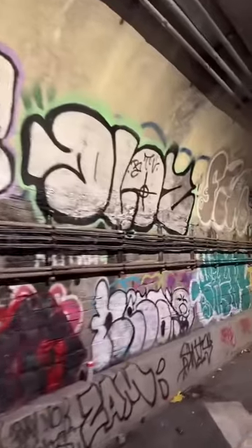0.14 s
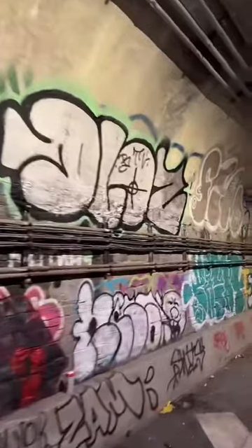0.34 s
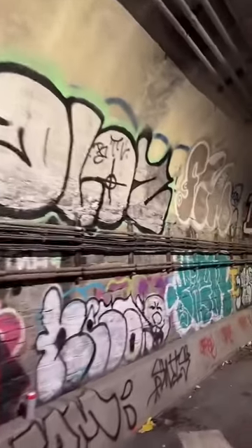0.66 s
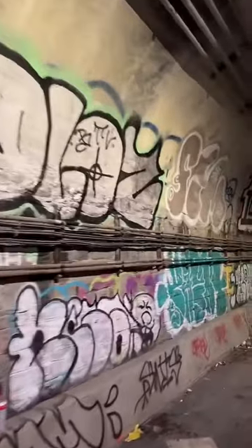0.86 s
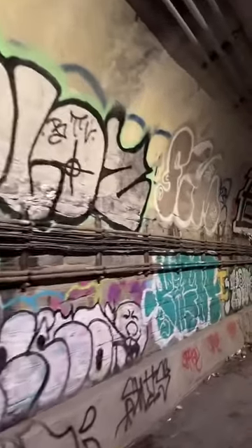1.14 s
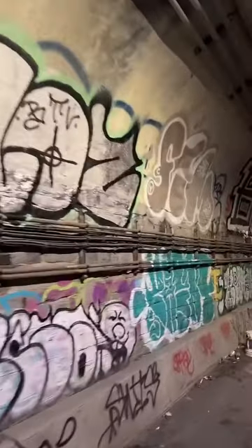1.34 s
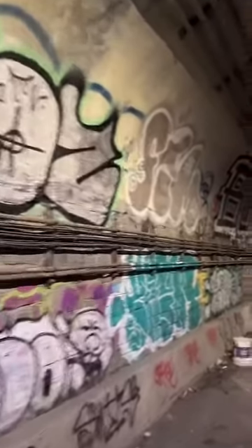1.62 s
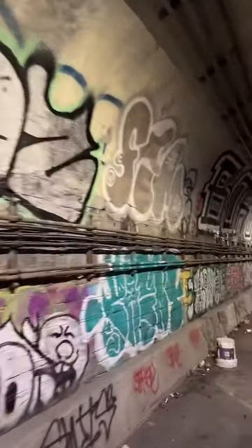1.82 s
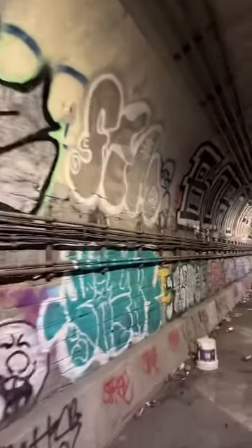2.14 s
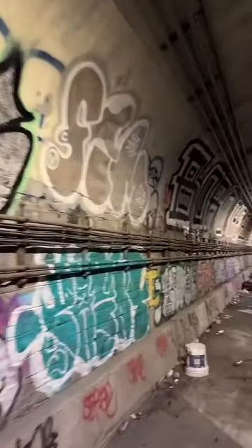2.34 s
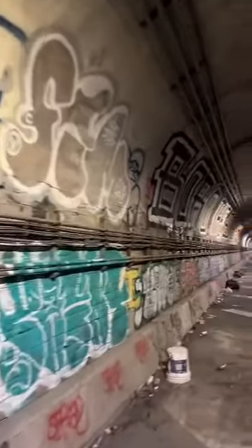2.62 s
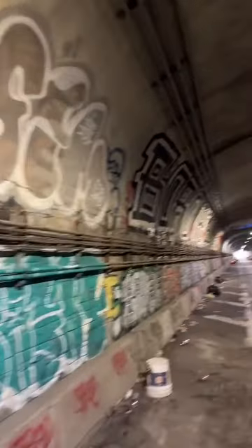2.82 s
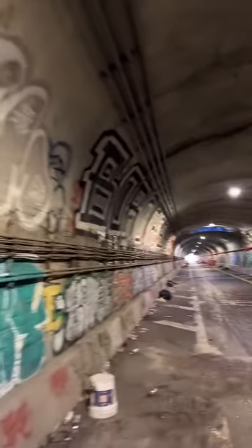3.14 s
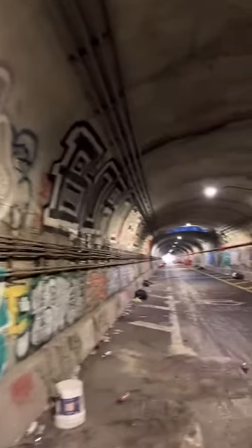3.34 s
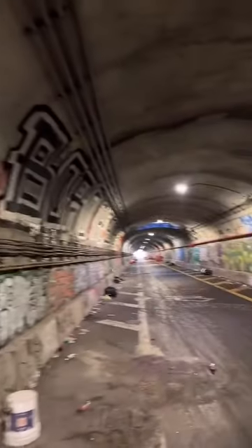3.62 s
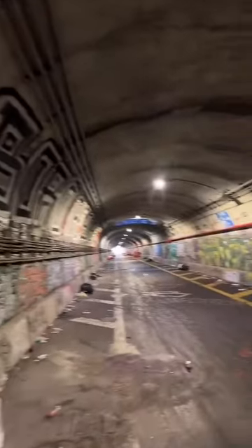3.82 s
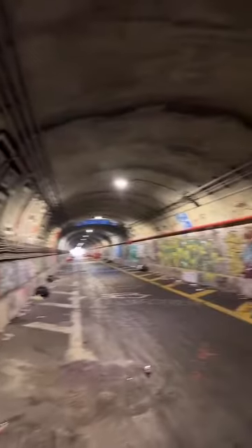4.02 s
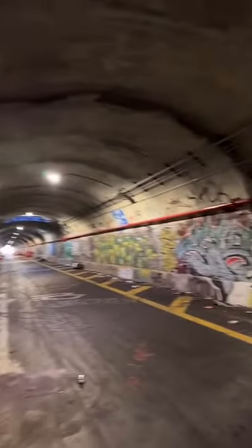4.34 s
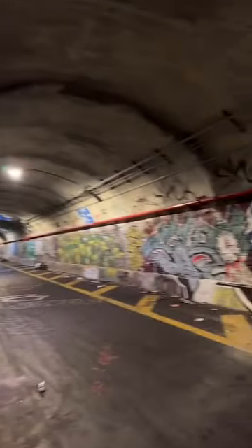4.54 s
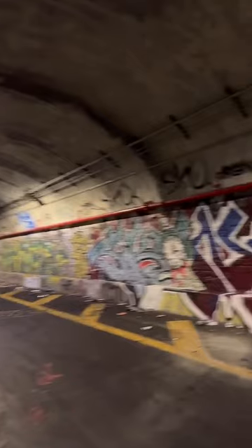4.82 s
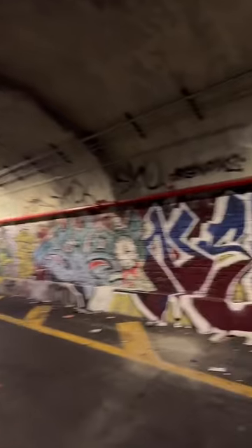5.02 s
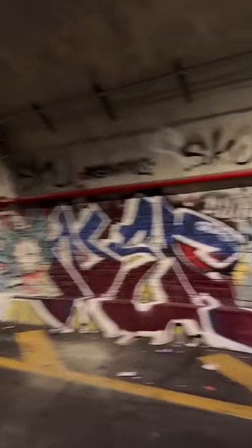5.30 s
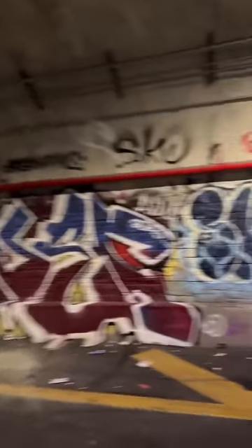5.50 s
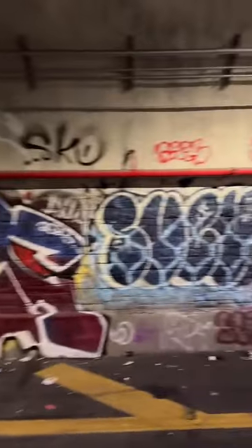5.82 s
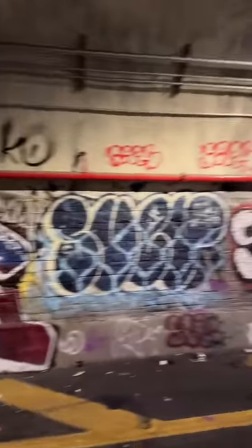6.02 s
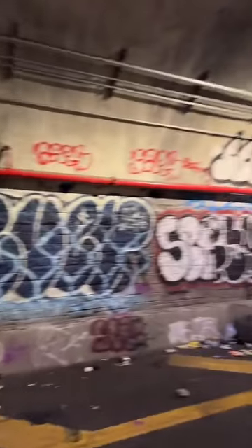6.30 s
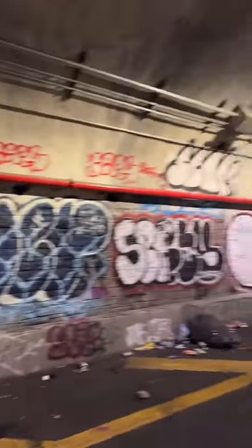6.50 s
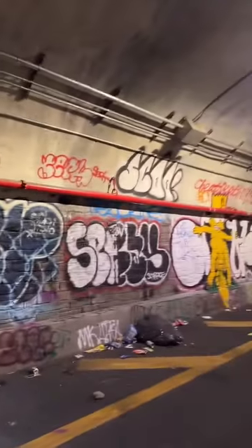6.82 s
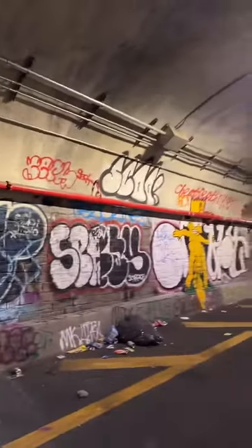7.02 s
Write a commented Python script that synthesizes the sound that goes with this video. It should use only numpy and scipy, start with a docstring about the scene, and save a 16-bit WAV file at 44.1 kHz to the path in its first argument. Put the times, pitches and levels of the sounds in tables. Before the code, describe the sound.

A hand-held microphone picks up a deep, steady-pitched fan drone in a long hard-walled tunnel. Low wind thuds open the scene, then thin out to a gentle rumble. Beneath the hum lie a dull airy roar, weak motor overtones and barely audible wavering whines. Close, soft clothing swishes pass several times a second, with faint casing creaks and irregular plastic ticks. The drone strengthens in the last two seconds.

```python
"""Ventilation motors hum in an empty road tunnel, heard on a hand-held microphone. The hum, on about twice the
mains frequency, its multiples, weak shaft tones and two thin whines are sines that swell and waver.
The far roar of air in the tube, the draught on the microphone and the walker's swishing clothes are shaped noise.
Short low bursts buffet the microphone; tiny clicks set its casing creaking, and short knocks make it tick."""
import sys
import numpy as np
from scipy import signal
from scipy.io import wavfile

SR = 44100
rng = np.random.default_rng(int(sys.argv[2]) if len(sys.argv) > 2 else 0)


def to_wav(sig):
    """Store sig (one row per channel, or 1-D mono) as 16-bit WAV at the path in sys.argv[1].

    Samples outside -1..1 are clipped; the rate is SR.
    """
    pcm = np.clip(np.atleast_2d(sig), -1, 1) * 32767
    pcm = np.round(pcm).astype(np.int16)
    wavfile.write(sys.argv[1], SR, pcm.T)  # frames by channels


N = 315756   # length in samples

# In every colour table only the shape counts: the noise is brought to rms 1 afterwards.
# Roar of air in the tube. Each row: time in seconds, level in dB, brightness in dB per octave.
ROAR_CURVE = [(0.0, -41.5, -0.5), (0.74, -44, 1), (1.3, -43, -0.5), (1.81, -44, 0.5), (4.73, -43.5, 0.5),
              (5.96, -41, 0), (7.16, -39.5, -1.5)]
# Colour of the roar. Each row: frequency in Hz, strength in dB per Hz.
ROAR_SPECTRUM = [(70, -27), (130, -10), (200, -0.5), (300, -4), (450, -12.5), (700, -17), (1000, -17),
                 (1350, -17.5), (1800, -29), (3000, -31), (6000, -51), (9000, -56), (11500, -68),
                 (13500, -62)]
# Draught on the microphone port. Each row: time in seconds, level in dB.
DRAUGHT_CURVE = [(0.0, -27.5), (0.32, -26.5), (0.45, -35.5), (1.4, -32), (2.15, -38), (2.6, -35),
                 (3.2, -36.5), (3.9, -33.5), (4.6, -39), (5.6, -34.5), (6.0, -40.5), (6.6, -33),
                 (7.16, -35)]
# Colour of the draught. Each row: frequency in Hz, strength in dB per Hz.
DRAUGHT_SPECTRUM = [(18, -28), (28, -14), (40, -13.5), (60, -3.5), (90, -6.5), (130, -14), (200, -22),
                    (350, -39)]
# Gusts on top of the draught. Each row: top in seconds, rise in seconds, fall in seconds, peak in dB.
GUST_SWELLS = [(0.9, .2, 0.086, -30), (1.52, 0.028, .08, -33), (4.71, 0.094, 0.11, -34),
               (6.74, 0.12, 0.063, -30.5)]
# Single buffets of the draught. Each row: start in seconds, peak in dB, pitch in Hz.
BUFFET_EVENTS = [(0.042, -20, 110), (0.094, -18.5, 100), (0.178, -23, 58), (0.284, -29, 67),
                 (0.307, -20, 100), (0.539, -24.5, 71.4), (.876, -20, 68), (1.005, -19.5, 104),
                 (1.505, -31, 72), (6.725, -31, 65)]

# Creaks of the casing. Each row: top in seconds, rise in seconds, fall in seconds, peak in dB.
CREAK_SWELLS = [(0.1, .1, 0.23, -55.5), (0.48, 0.25, 0.12, -52), (1.04, 0.16, 0.09, -59),
                (1.7, 0.2, 0.046, -57), (2.3, 0.16, .25, -52), (2.95, 0.17, .13, -47),
                (3.22, 0.18, 0.17, -51.5), (3.55, 0.13, 0.1, -54), (4.36, 0.089, .06, -58),
                (4.88, 0.24, 0.26, -54), (5.7, 0.2, .35, -57.5), (6.6, 0.32, .4, -55)]
CREAK_REST_DB, CREAK_WAVER_DB = -71.5, 1.5
CREAK_HZ, SLIPS_PER_S = 1200, 900
# Ticks of the casing. Each row: start in seconds, then level in dB of the low, middle and high modes.
TICK_EVENTS = [(2.207, -37, -54, -60), (2.334, -33, -52, -56), (2.3524, -19.5, -37, -39),
               (2.359, -22, -47, -43), (2.384, -39, -43, -52), (2.393, -37, -60, -60),
               (2.406, -32, -58, -62), (2.411, -35, -60, -60), (2.417, -30, -60, -55),
               (2.758, -37, -52, -60), (2.767, -34, -40, -58), (2.773, -36, -60, -60),
               (2.829, -40, -41, -56), (2.836, -34, -60, -60), (3.765, -60, -58, -50),
               (4.039, -51, -44, -51), (5.160, -54, -54, -47), (5.483, -60, -43.5, -52),
               (5.622, -62, -60, -52), (6.5742, -34, -60, -62), (6.5758, -50, -33, -40.5),
               (6.590, -38, -43, -54), (6.594, -44, -40, -52), (6.603, -38, -41, -58)]
# Modes of the casing in three groups: low, middle, high.
# Each row of a group: frequency in Hz, level in dB against the tick, half the time to the top in ms.
CASING_MODES = [
    [(1200, 0.5, 0.51)],
    [(2260, -9, 0.35), (3060, -1.5, .3), (4160, 4.5, 0.19)],
    [(5100, 0, 0.5), (6660, -1, .2), (12300, -14, .25)],
]

# Swishes of clothing. Each row: top in seconds, rise in seconds, fall in seconds, peak in dB,
# brightness in dB per octave, sizzle in dB against the peak.
SWISH_SWELLS = [(0.02, 0.12, 0.27, -59, -7, -7), (0.27, 0.11, 0.091, -54.5, 1, -7),
                (0.43, 0.097, 0.15, -46, -0.5, -5), (0.68, 0.12, 0.15, -56, -2.5, -6),
                (0.84, .08, 0.094, -59, -1.5, -3), (1.06, 0.11, 0.13, -50, -2.5, -10.5),
                (1.24, 0.083, .15, -53.5, 1.5, -9), (1.44, 0.21, 0.14, -55.5, 0.5, -5.5),
                (1.63, 0.08, 0.18, -50.5, -.5, -4.5), (2.06, 0.35, 0.11, -53.5, 0.5, -7.5),
                (2.28, 0.16, 0.16, -48.5, -1.5, -9.5), (2.52, 0.13, 0.14, -49, 2.5, -9.5),
                (2.67, 0.12, 0.076, -49, 3, -10), (2.89, .15, 0.16, -48, -1, -5),
                (3.3, 0.28, 0.11, -51, -1, -5.5), (3.49, 0.1, 0.15, -48, -1.5, -7.5),
                (3.68, 0.094, 0.1, -57, 1, -6), (3.92, 0.2, 0.088, -52.5, 2, -3),
                (4.15, 0.12, 0.12, -48, 1, -5.5), (4.35, 0.11, .08, -49, 0.5, -8.5),
                (4.53, 0.16, 0.16, -51, 1, -8), (4.76, 0.14, 0.15, -50.5, -1.5, -7),
                (4.929, 0.079, .08, -54.5, -2.5, -7.5), (5.15, 0.2, 0.14, -53, 4.5, -6),
                (5.35, 0.21, 0.17, -52, 0, -9), (5.519, 0.068, 0.24, -56, -1.5, -7),
                (5.81, 0.086, 0.08, -53, 3, -6), (5.93, 0.079, 0.053, -53, -2.5, -7),
                (6.12, 0.17, 0.24, -50.5, 0.5, -7), (6.35, 0.13, 0.2, -50, -0.5, -2.5),
                (6.599, 0.082, 0.35, -54.5, -4, -9.5), (6.94, .06, 0.042, -59, -3, -7),
                (7.16, .1, .1, -60.5, -4, -4)]
# Faint rustle between swishes. Each row: time in seconds, level in dB.
RUSTLE_CURVE = [(0.0, -58.5), (3.0, -57), (4.0, -60.5), (6.2, -61.5), (7.16, -63)]
# Colour of the swishes. Each row: frequency in Hz, strength in dB per Hz.
SWISH_SPECTRUM = [(700, 1), (1500, -3.5), (2600, 1), (4000, -2), (5200, -5), (6500, -8.5), (8000, -10.5),
                  (9800, -9), (11500, -26), (13500, -16.5)]
# Colour of the sizzle from smooth cloth. Each row: frequency in Hz, strength in dB per Hz.
SIZZLE_SPECTRUM = [(4600, -8), (5800, 6), (6600, 4.5), (7600, 2.5), (9500, -27.5)]
SWELL_ROUNDNESS = 1.02   # shape of all swells: 1 = broad tops, 2 = slim ones

# Motor hum, swelling as the listener walks through standing waves. Each row: time in seconds, level in dB.
HUM_CURVE = [(0.0, -32.5), (0.36, -32.5), (0.48, -37), (0.62, -34.5), (1.1, -32), (1.29, -29.5),
             (2.05, -29), (2.13, -26.5), (2.63, -26.5), (3.3, -30.5), (3.67, -28.5), (4.22, -29),
             (4.33, -32), (4.63, -30.5), (4.79, -27.5), (5.5, -25.5), (6.5, -25.5), (6.8, -26), (7.16, -27)]
HUM_HZ = 119.75
# Multiples of the hum. Each row: multiple of the hum's pitch, level in dB against the hum.
HUM_MULTIPLES = [(2, -30), (3, -35)]
# Weaker motor tones, near multiples of the shaft speed. Each row: pitch in Hz, level in dB.
SHAFT_LINES = [(86.5, -49), (179.3, -56.5), (208.3, -58), (272, -57), (389, -60), (424, -63.5),
               (443, -70.5)]
SHAFT_WAVER_DB = 2.5
# Fifth multiple of the shaft speed. Each row: time in seconds, level in dB.
FIFTH_CURVE = [(0.0, -45), (0.46, -56), (0.8, -44), (1.6, -62), (2.45, -48.5), (3.27, -46), (4.27, -51.5),
               (5.5, -40), (7.16, -41)]
FIFTH_HZ = 149.4
# Fourth multiple of the hum and a high shaft tone, both coming and going.
# Each row: time in seconds, fourth multiple in dB, high shaft tone in dB.
FOURTH_AND_HIGH_CURVES = [(0.0, -60, -74), (0.8, -71, -61.5), (1.5, -57.5, -64), (2.1, -54, -71),
                          (2.5, -70, -62.5), (3.302, -60.5, -73), (3.8, -70, -66), (5.2, -60.5, -66),
                          (6.1, -73.5, -64.5), (7.16, -74, -64)]
# Average pitches of these two: fourth multiple of the hum in Hz, high shaft tone in Hz.
FOURTH_AND_HIGH_PITCHES = (478.6, 712.0)
FOURTH_AND_HIGH_WAVER_DB, FOURTH_AND_HIGH_WAVER_RATE_HZ = 3, 3.0
# Swells of the lower whine. Each row: top in seconds, rise in seconds, fall in seconds, peak in dB.
LOW_WHINE_SWELLS = [(0.0, .1, .6, -64), (2.33, 0.23, 0.2, -61), (2.87, .2, 0.16, -59), (4.4, 0.13, .5, -59),
                    (5.92, 0.11, 0.14, -54.5), (6.62, .3, 0.13, -59), (7.1, 0.4, .3, -57)]
# Swells of the higher whine. Each row: top in seconds, rise in seconds, fall in seconds, peak in dB.
HIGH_WHINE_SWELLS = [(0.9, .6, 0.27, -66), (1.62, 0.088, 0.16, -64), (1.88, 0.055, 0.34, -62),
                     (2.23, 0.12, 0.32, -61), (4.56, 0.17, 0.09, -59), (5.31, .1, 0.12, -57.5),
                     (5.63, 0.09, .1, -62.5), (5.9, 0.18, 0.36, -59.5), (6.37, .12, .12, -57.5)]
# Average pitches of the whines: lower in Hz, higher in Hz.
WHINE_PITCHES = (1337, 2491)
# Levels of the whines between swells: lower in dB, higher in dB.
WHINE_RESTS = (-64, -68.5)

# Microphone: resonance of its port, then the upper limit of the sound.
PORT_HZ, PORT_WIDTH_HZ = 13050, 600
PORT_DB = 3.0   # level of the resonance added to the direct sound
CUTOFF_HZ = 13060


def from_db(db):
    """Turn a level in dB into a gain."""
    return 10 ** (np.asarray(db) / 20)


def rms_one(x):
    """Scale a sound to rms 1."""
    return x / np.sqrt(np.mean(x ** 2) + 1e-20)


def in_time(rows):
    """Draw straight lines between the rows of a curve, giving each column sample by sample."""
    s, *columns = np.transpose(rows)
    t = np.arange(N) / SR
    return [np.interp(t, s, column) for column in columns]


def drift(rate):
    """Wander slowly by chance with spread 1: noise at every 40th sample, smoothed twice above the rate in Hz."""
    pole = np.exp(-2 * np.pi * rate * 40 / SR)
    noise = rng.standard_normal(N // 40 + 2002)
    slow = signal.lfilter([1], [1, -2 * pole, pole * pole], noise)[2000:]   # skip the settling
    slow = rms_one(slow - slow.mean())
    return np.interp(np.arange(N) / 40, np.arange(len(slow)), slow)


def swells(rows, rest_db):
    """Raise and lower the power of each row around its top; the resting power comes last."""
    t = np.arange(N) / SR
    powers = []
    for top, rise, fall, peak_db, *_ in rows:
        distance = np.where(t < top, (top - t) / rise, (t - top) / fall)   # 0 at the top, 1 at the ends
        shape = np.cos(np.pi / 2 * np.clip(distance, 0, 1)) ** (2 * SWELL_ROUNDNESS)
        powers.append(from_db(2 * peak_db) * shape)   # twice the dB turns gain into power
    powers.append(np.full(N, from_db(2 * rest_db)))
    return np.array(powers)


def swell_gain(rows, rest_db):
    """Add the powers of all swells and the rest, and turn the sum into a gain."""
    return np.sqrt(swells(rows, rest_db).sum(0))


def banded_noise(colour, patchy_db, patch_rate, tilt_db=0, pivot=5000):
    """Sum third-octave bands of noise, each with its own level and flicker; the tilt turns about the pivot in Hz."""
    knots_hz, knots_db = np.transpose(colour)
    edges = 16 * 2 ** (np.arange(31) / 3)
    edges = edges[(edges >= knots_hz[0] * .9) & (edges <= knots_hz[-1] * 1.25)]
    white = rng.standard_normal((2, N + SR // 4))   # neighbouring bands get unrelated noise
    out = 0
    for k, (low, high) in enumerate(zip(edges, edges[1:])):
        band_filter = signal.butter(2, [low, high], "band", fs=SR, output="sos")
        band = signal.sosfilt(band_filter, white[k % 2])[-N:]
        hz = np.sqrt(low * high)
        level_db = np.interp(np.log(hz), np.log(knots_hz), knots_db) + tilt_db * np.log2(hz / pivot)
        out = out + band * from_db(level_db + patchy_db * drift(patch_rate))
    return rms_one(out)


def tone(hz):
    """Make a sine of rms 1 on a steady or moving pitch."""
    turns = np.cumsum(np.broadcast_to(hz, N)) / SR + rng.random()
    return np.sqrt(2) * np.sin(2 * np.pi * turns)


def ring(clicks, hz, t60):
    """Let each click start a sine of about its own height, fading by 60 dB in t60 seconds."""
    pole = from_db(-60 / (t60 * SR))
    w = 2 * np.pi * hz / SR
    return signal.lfilter([0, np.sin(w)], [1, -2 * pole * np.cos(w), pole * pole], clicks + 1e-18)


def knock(hz, swell_ms):
    """A soft contact on damped plastic: a few cycles that swell and die, in an envelope of height 1."""
    t = np.arange(SR // 50) / SR
    u = t * 1000 / swell_ms   # the envelope tops at u = 2
    return (u / 2) ** 2 * np.exp(2 - u) * np.sin(2 * np.pi * hz * t)


def air_roar():
    """The far roar of air in the tube: noise whose level and brightness move slowly."""
    level_db, tilt_db = in_time(ROAR_CURVE)
    noise = banded_noise(ROAR_SPECTRUM, patchy_db=1.0, patch_rate=7.3, tilt_db=tilt_db, pivot=370)
    return from_db(level_db) * noise


def draught():
    """Moving air rumbles on the microphone port: low noise with gusts on top."""
    gusting = swell_gain(GUST_SWELLS, in_time(DRAUGHT_CURVE)[0])
    return gusting * banded_noise(DRAUGHT_SPECTRUM, patchy_db=-0.5, patch_rate=4.4)


def buffets():
    """Each eddy pushes the port for a cycle or two."""
    t = np.arange(SR // 10) / SR
    out = np.zeros(N + len(t))
    for start, peak_db, hz in BUFFET_EVENTS:
        u = 2 * hz * t   # the swell tops after one cycle
        push = (u / 2) ** 2 * np.exp(2 - u) * np.cos(2 * np.pi * hz * t)
        at = int(start * SR)
        out[at:at + len(t)] -= from_db(peak_db) * push
    return out[:N]


def casing_creaks():
    """Dense tiny slips under the fingers set the lowest mode of the casing ringing."""
    sizes = from_db(2.1 * np.minimum(rng.exponential(1, N), 5)) * rng.choice([-1, 1], N)
    slips = sizes * (rng.random(N) < SLIPS_PER_S / SR)
    creak = rms_one(ring(ring(slips, CREAK_HZ, .009), CREAK_HZ, .014))
    return swell_gain(CREAK_SWELLS, CREAK_REST_DB) * from_db(CREAK_WAVER_DB * drift(15)) * creak


def casing_ticks():
    """A tick strikes the modes of the casing group by group."""
    out = np.zeros(N)
    start, *levels_db = np.transpose(TICK_EVENTS)
    for group, level_db in zip(CASING_MODES, levels_db):
        clicks = np.zeros(N)
        clicks[(start * SR).astype(int)] = from_db(level_db)
        struck = sum(from_db(db) * knock(hz, ms) for hz, db, ms in group)
        out += signal.fftconvolve(clicks, struck)[:N]
    return out


def clothing():
    """Cloth rubs with the walker's strides: noisy swishes, each with its own brightness and share of sizzle."""
    powers = swells(SWISH_SWELLS, in_time(RUSTLE_CURVE)[0])
    total = powers.sum(0)
    *_, brightness, sizzle_db = np.transpose(SWISH_SWELLS)
    tilt_db = brightness @ powers[:-1] / total   # average weighted by power; the rustle has no tilt
    swish = banded_noise(SWISH_SPECTRUM, patchy_db=1.83, patch_rate=11.0, tilt_db=tilt_db)
    sizzle = banded_noise(SIZZLE_SPECTRUM, patchy_db=3.0, patch_rate=8.3)
    sizzle_power = from_db(2 * sizzle_db) @ powers[:-1]
    return np.sqrt(total) * swish + np.sqrt(sizzle_power) * sizzle


def whines():
    """Two thin whines swell and shift a little in pitch; many echo paths make them flutter."""
    out = np.zeros(N)
    for hz, rows, rest_db in zip(WHINE_PITCHES, (LOW_WHINE_SWELLS, HIGH_WHINE_SWELLS), WHINE_RESTS):
        flutter = from_db(2.16 * drift(11.6))
        out += swell_gain(rows, rest_db) * flutter * tone(hz + drift(5.7))
    return out


def shaft_tones():
    """The turning shafts give weak, wavering tones near multiples of their speed."""
    fifth_db = in_time(FIFTH_CURVE)[0] + SHAFT_WAVER_DB * drift(2.7)
    out = from_db(fifth_db) * tone(FIFTH_HZ)
    for hz, db in SHAFT_LINES:
        out += from_db(db + SHAFT_WAVER_DB * drift(1.8)) * tone(hz)
    return out


def fourth_multiple_and_high_shaft_tone():
    """The fourth multiple of the hum and a high shaft tone come and go, wavering in level and pitch."""
    out = np.zeros(N)
    for hz, db in zip(FOURTH_AND_HIGH_PITCHES, in_time(FOURTH_AND_HIGH_CURVES)):
        level_db = db + FOURTH_AND_HIGH_WAVER_DB * drift(FOURTH_AND_HIGH_WAVER_RATE_HZ)
        out += from_db(level_db) * tone(hz + 1.49 * drift(6.1))
    return out


def motor_hum():
    """The motors hum on a steady pitch, with wavering multiples that share the hum's swelling."""
    hum = tone(HUM_HZ)
    for multiple, db in HUM_MULTIPLES:
        hum += from_db(db + 2.0 * drift(0.52)) * tone(multiple * HUM_HZ)
    return from_db(in_time(HUM_CURVE)[0]) * hum


def scene():
    """Add air, casing, clothing and motors at one microphone."""
    air = air_roar() + draught() + buffets()
    casing = casing_creaks() + casing_ticks()
    motors = whines() + shaft_tones() + fourth_multiple_and_high_shaft_tone() + motor_hum()
    return (air + casing + clothing() + motors)[None]   # one channel


def record(dry):
    """The port lifts the highest treble, then the top is cut steeply."""
    b, a = signal.iirpeak(PORT_HZ, PORT_HZ / PORT_WIDTH_HZ, fs=SR)
    lifted = dry + from_db(PORT_DB) * signal.lfilter(b, a, dry)
    top_cut = signal.ellip(12, .5, 60, CUTOFF_HZ, fs=SR, output="sos")
    return signal.sosfilt(top_cut, lifted)


dry = scene()
out = record(dry)
to_wav(out)
```